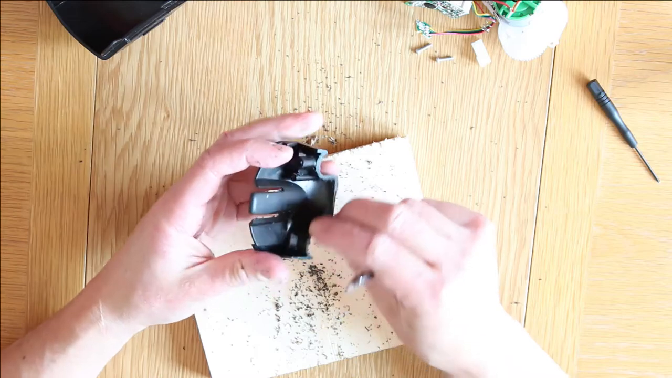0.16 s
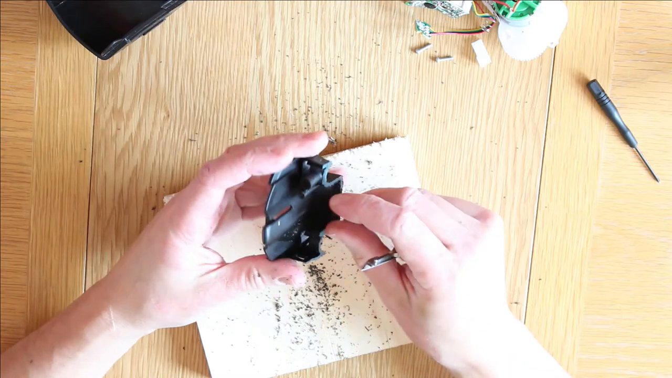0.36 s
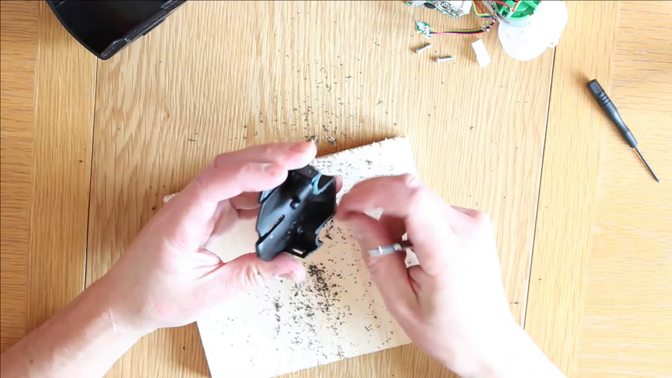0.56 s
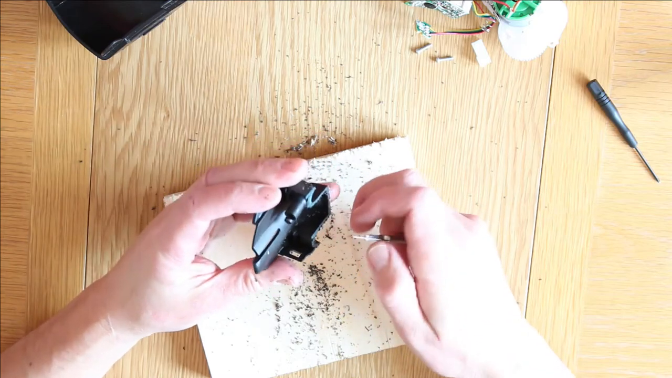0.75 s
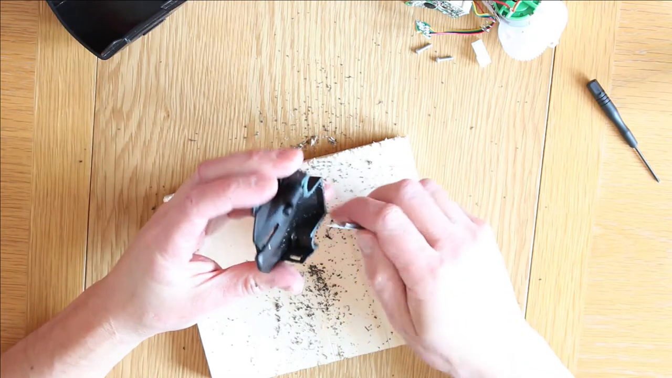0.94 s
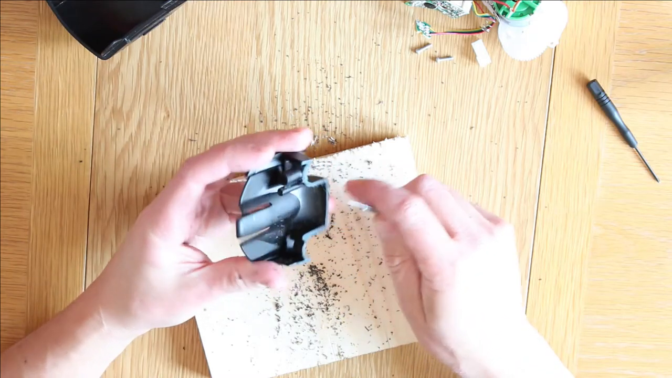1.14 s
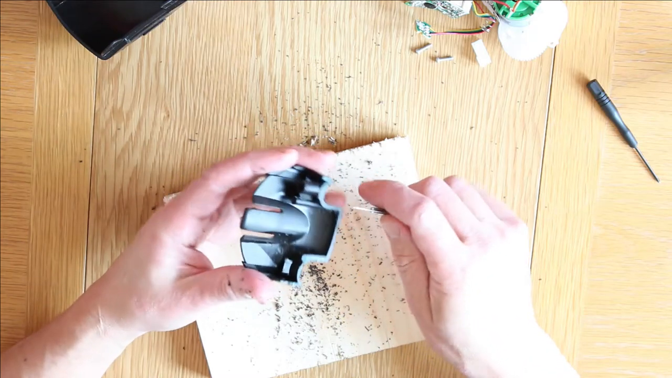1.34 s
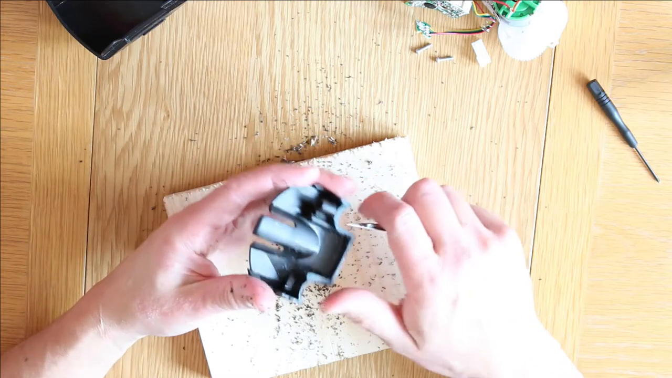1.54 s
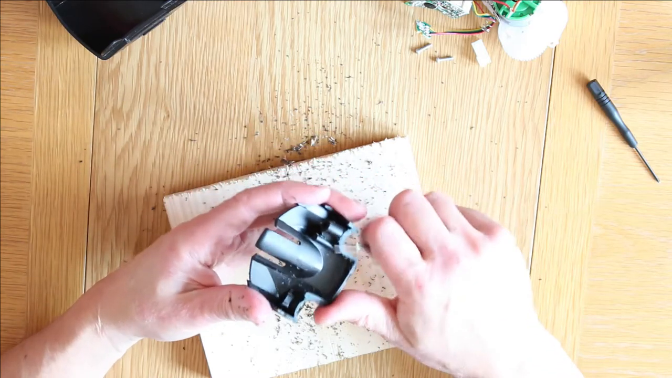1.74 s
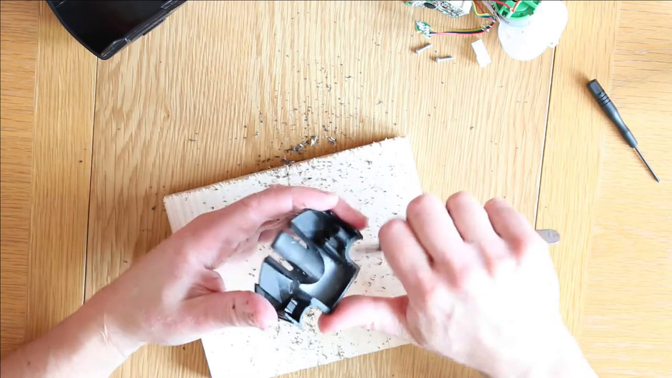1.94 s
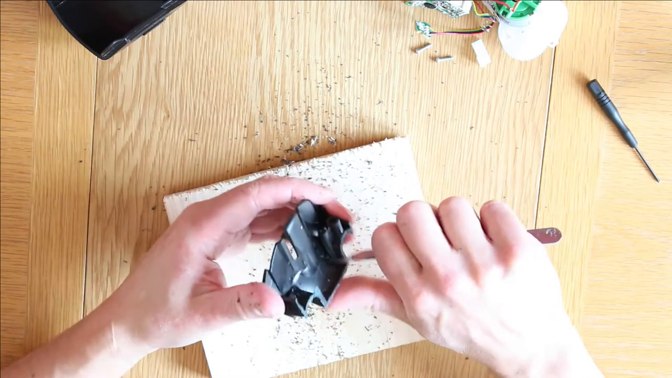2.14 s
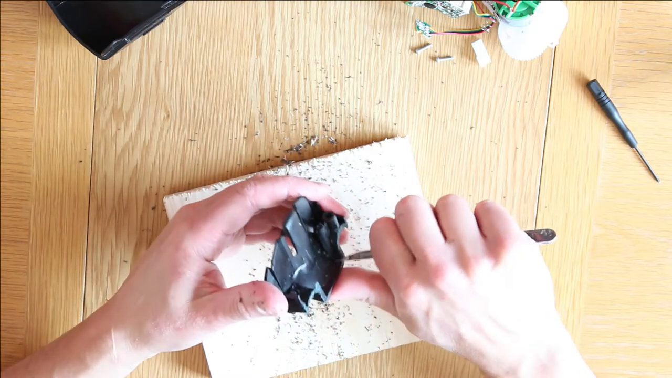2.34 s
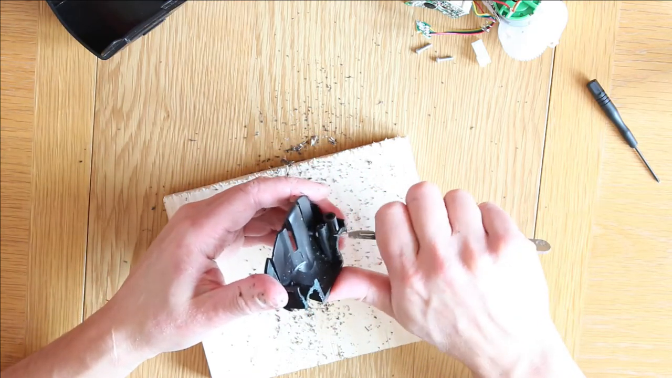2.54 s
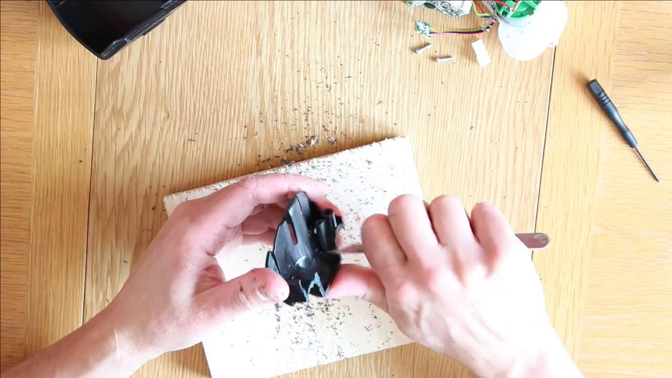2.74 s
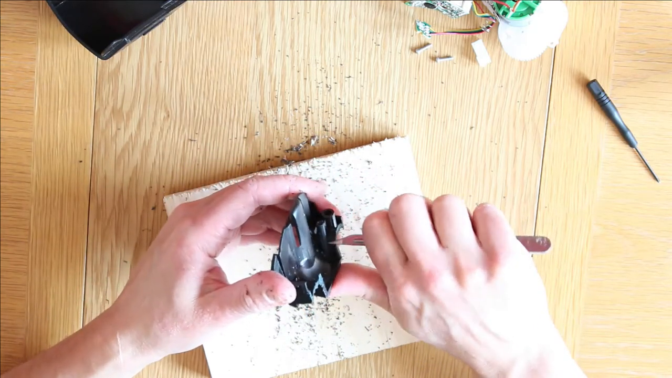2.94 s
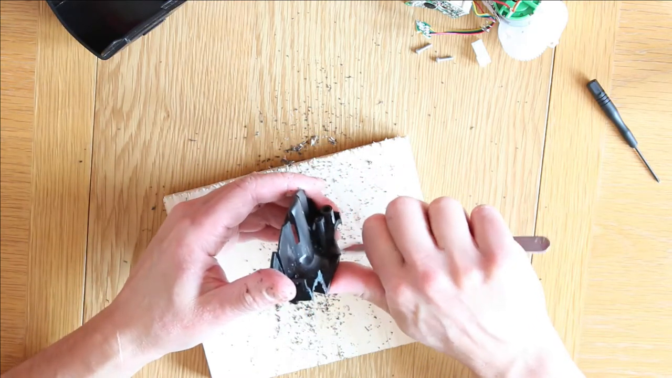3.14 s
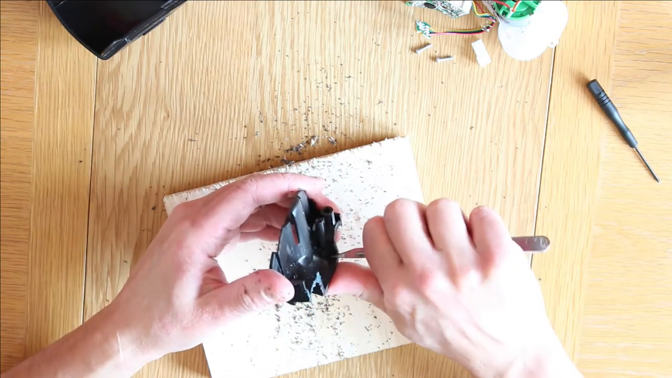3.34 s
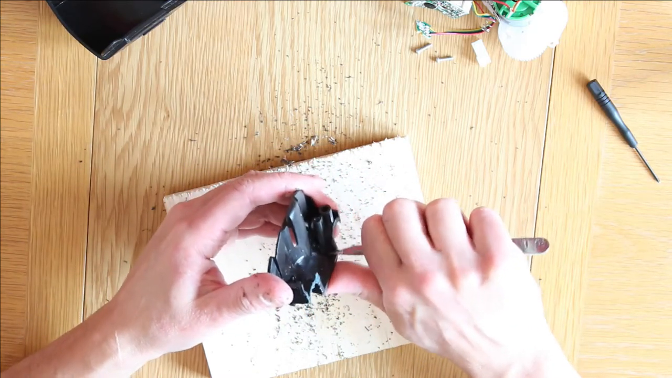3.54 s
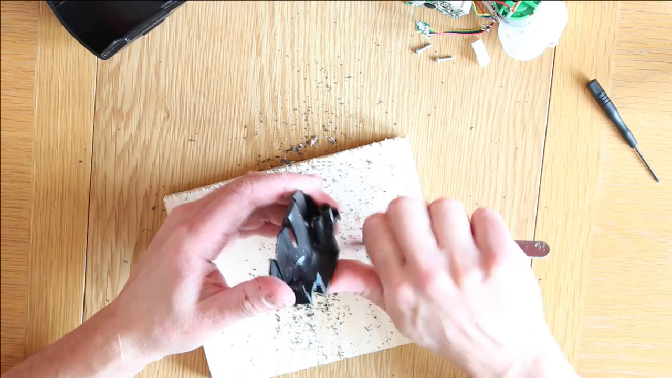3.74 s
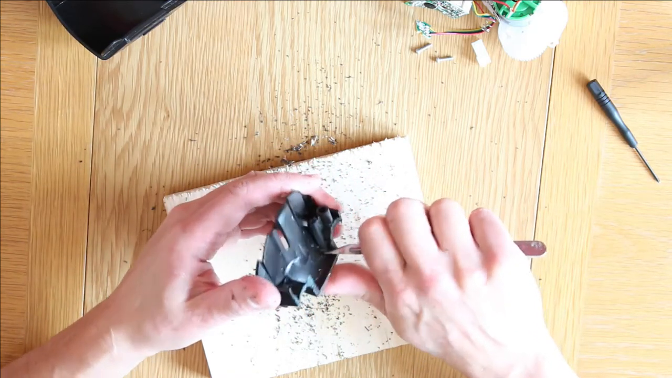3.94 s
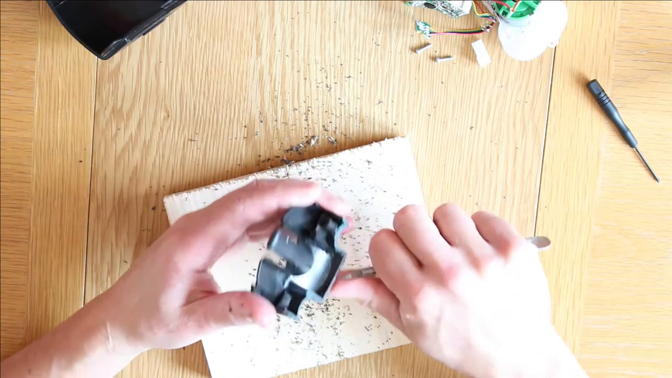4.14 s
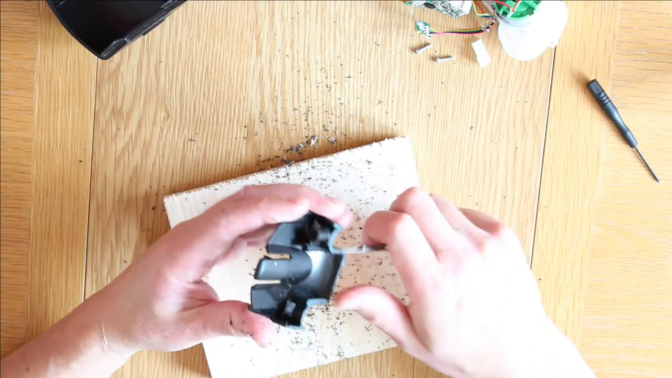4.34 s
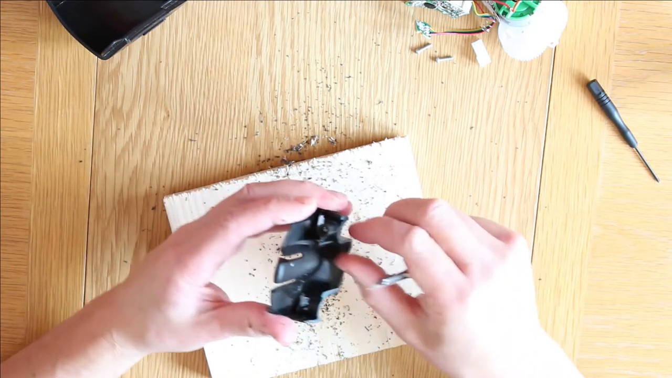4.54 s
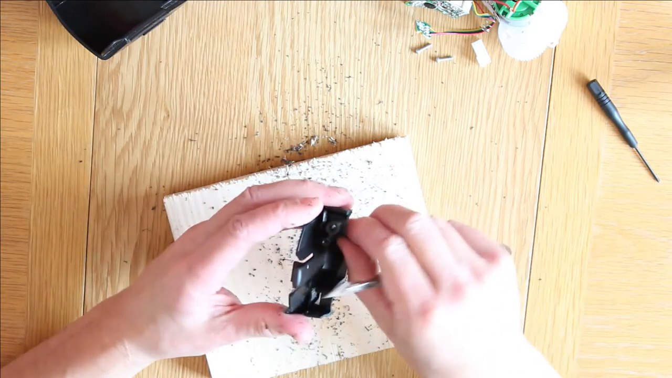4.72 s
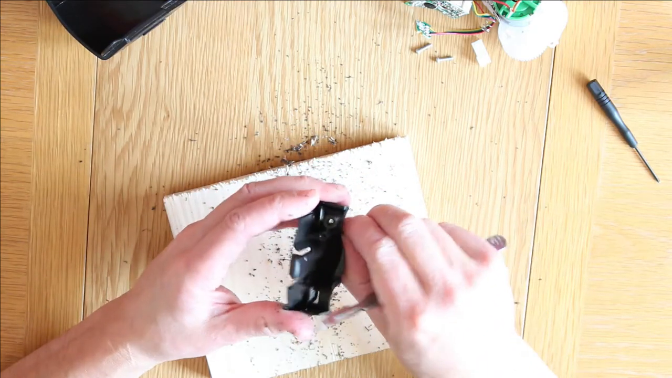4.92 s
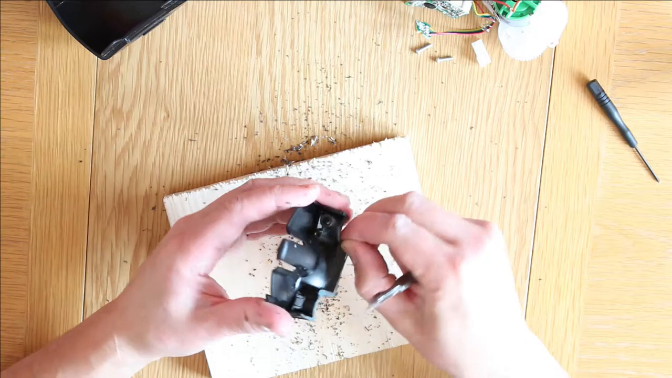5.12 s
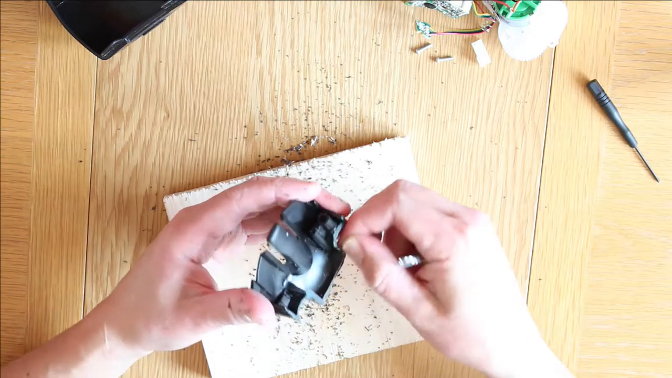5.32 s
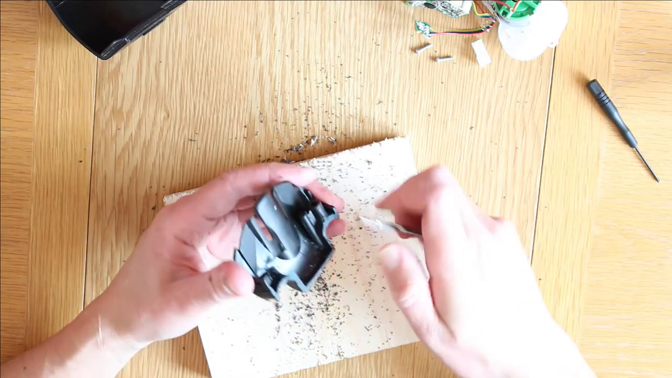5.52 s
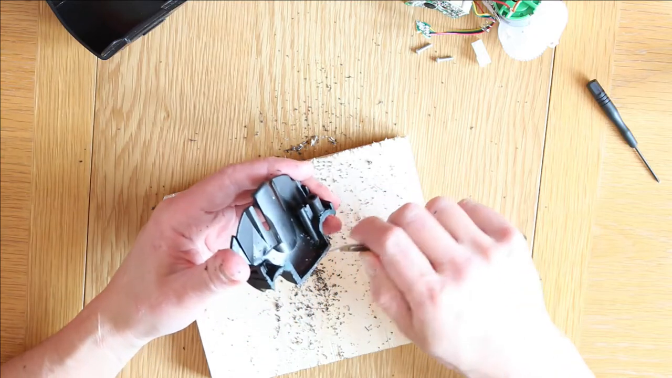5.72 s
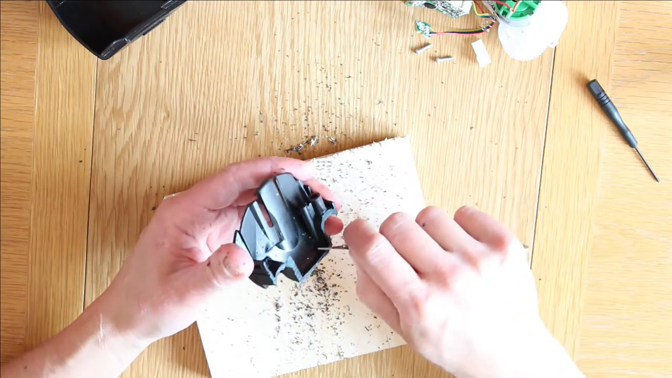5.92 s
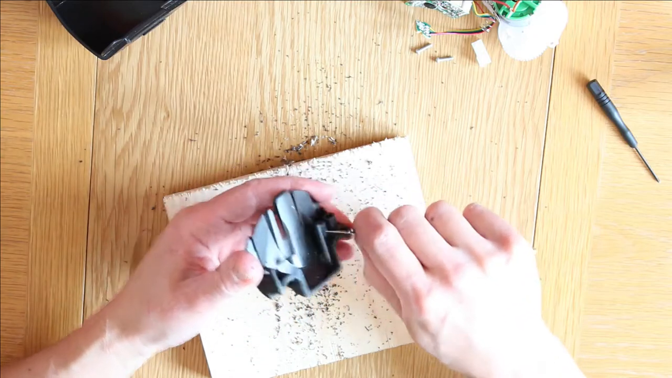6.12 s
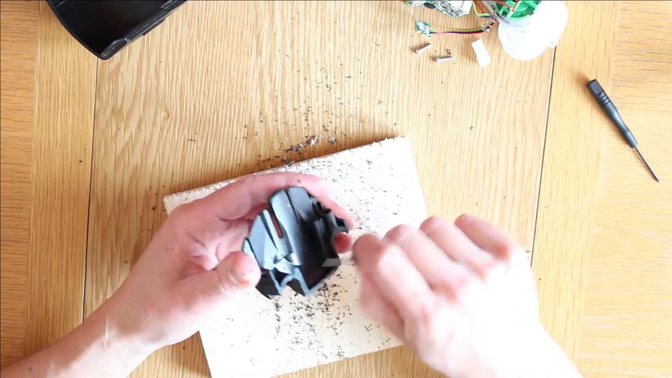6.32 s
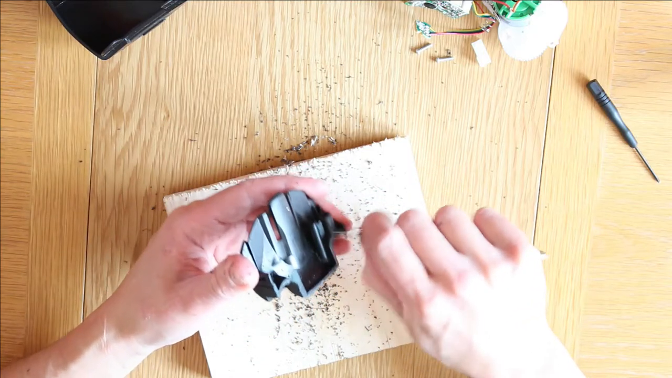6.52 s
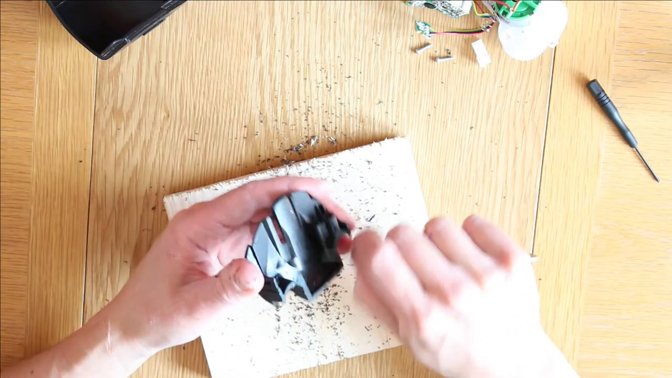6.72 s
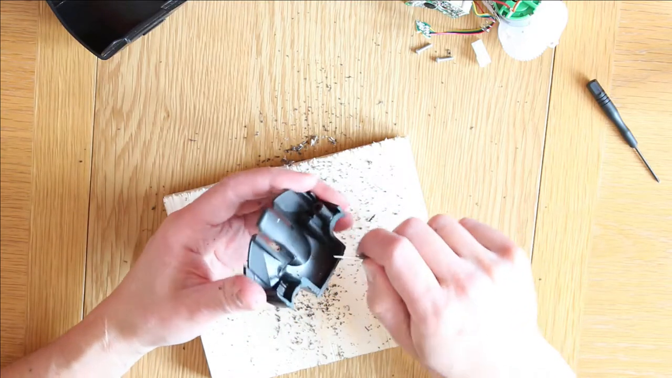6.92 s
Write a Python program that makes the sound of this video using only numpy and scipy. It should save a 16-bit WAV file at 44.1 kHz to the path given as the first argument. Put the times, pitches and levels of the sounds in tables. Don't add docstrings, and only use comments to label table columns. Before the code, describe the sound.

A small blade scrapes burrs from a thin plastic shell in short, dry, clicky stroke bursts with pauses, in a quiet bare room.

```python
import sys
import numpy as np
from scipy import signal
from scipy.fft import rfft, irfft
from scipy.io import wavfile

SR = 44100
rng = np.random.default_rng(int(sys.argv[2]) if len(sys.argv) > 2 else 0)


def dump(signal):
    limited = np.clip(np.atleast_2d(signal).T, -1, 1)
    pcm = np.round(limited * 32767).astype(np.int16)
    wavfile.write(sys.argv[1], SR, pcm)


def volts_from_db(level):
    exponent = np.asarray(level, float) / 20
    return 10 ** exponent


N = 311787

SPOT_CHANGES = [
    2.45,
    2.735,
    3.72,
    5.6,
]


def rms_one(x):
    return x / np.sqrt(np.mean(x ** 2) + 1e-20)


def in_time(rows):
    s, *columns = np.transpose(rows)
    return [np.interp(np.arange(N) / SR, s, column) for column in columns]


def at_hz(points, hz, axis=1):
    points = np.array(points)
    return np.interp(np.log(hz + 1), np.log(points[:, 0]), points[:, axis])


def coloured(spectrum):
    hz = np.fft.rfftfreq(N + 1, 1 / SR)
    white = rfft(rng.standard_normal(N + 1))
    return rms_one(irfft(white * volts_from_db(at_hz(spectrum, hz)), N + 1)[:N])


def room_tone():
    # f/Hz, density/dB per Hz
    mid_spectrum = [(24, -40), (40, -15), (109, -8), (147, -3.5), (529, -8.5), (646, -10.5), (990, -11),
                    (1440, -13.5), (4030, -15.5), (16000, -26.5)]
    # f/Hz, density/dB per Hz
    side_spectrum = [(24, -31), (40, -7), (49, -23), (112, -3), (412, -5), (1720, -11.5), (3470, -14.5),
                     (12500, -27.5), (14500, -40), (16000, -58)]
    mid = volts_from_db(-60.5) * coloured(mid_spectrum)
    side = volts_from_db(-56.5) * coloured(side_spectrum) + 0.22 * mid
    return np.stack([mid + side, mid - side])


def rumble():
    # t/s, f/Hz, level/dB
    run_down = [
        (0.0, 23.9, -63),
        (0.9, 23.5, -69),
        (1.9, 23.56, -70.5),
        (3.9, 21.8, -74),
        (7.07, 21, -88),
    ]
    hz, level_db = in_time(run_down)
    sine = volts_from_db(level_db + 13.0) * np.sin(2 * np.pi * np.cumsum(hz) / SR)
    drone = volts_from_db(0.67 * level_db - 21) * coloured([(45, -36), (68, 16), (100, -5), (150, -12), (220, -31)])
    right_under_left_db = 12.5
    return np.stack([sine + drone, -sine * volts_from_db(-right_under_left_db) - 0.29 * drone])


def room_tail():
    # f/Hz, t60/s, left-right correlation/1
    reverberation = [(299.4, 0.56, 0.97), (720, 0.34, 0.69), (2000, 0.41, 0.59), (5500, 0.43, 0.42),
                     (8850, 0.36, -0.13), (13800, 0.25, 1)]
    t = np.arange(SR // 2) / SR
    edges = 200 * 2 ** np.arange(0, 6.6, .5)
    tail = 0
    for low, high in zip(edges, edges[1:]):
        centre = np.sqrt(low * high)
        band = signal.butter(2, [low, high], "band", fs=SR, output="sos")
        mid, side = signal.sosfilt(band, rng.standard_normal((2, len(t))))
        alike = np.clip(at_hz(reverberation, centre, axis=2), -1, 1)
        dying = volts_from_db(-60 * t / at_hz(reverberation, centre))
        tail = tail + dying * (np.sqrt(1 + alike) * mid + np.sqrt(1 - alike) * side * [[1], [-1]])
    tail = tail * np.clip((t - .002) / 0.0037, 0, 1)
    return tail / np.sqrt(np.sum(tail ** 2) / 2)


def room(x):
    turn = 2 * np.pi * 3 * np.arange(N) / SR
    tails = 0
    for share in (np.cos(turn), np.sin(turn)):
        tails = tails + signal.fftconvolve((x * share)[None], room_tail(), axes=1)[:, :N]
    lag = round(.0075 * SR)
    echo = np.stack([np.roll(x, lag), -.5 * np.roll(x, lag + 5)])
    balance_db = np.array([[1.9], [-1.9]])
    return (volts_from_db(-0.5) * tails + volts_from_db(-3.5) * echo) * volts_from_db(balance_db)


def microphones(x):
    high_pass = signal.butter(2, 4000, "high", fs=SR, output="sos")
    treble = signal.sosfilt(high_pass, np.roll(x, round(.0006 * SR)))
    balance_db = np.array([[2.7], [-3.2]])
    return (x + 0.58 * treble * [[1], [-1]]) * volts_from_db(balance_db)


def squeak():
    # t/s, length/s, start f/Hz, end f/Hz, flutter width/Hz, level/dB
    songs = [
        (0.676, 0.053, 5650, 5600, 25, -67.5),
        (3.193, 0.038, 1173, 1326, 150, -56.5),
        (3.23, 0.0502, 1391, 1717, 198, -49.5),
    ]
    out = np.zeros(N)
    for s, length, start_hz, end_hz, width, level_db in songs:
        u = np.linspace(0, 1, round(length * SR))
        jitter = rng.standard_normal((2, SR // 5))[:, :len(u)]
        flutter = rms_one(signal.lfilter(*signal.butter(1, width, fs=SR), jitter))
        phase = 2 * np.pi * np.cumsum(start_hz + (end_hz - start_hz) * u) / SR
        tone = (1 + flutter[0]) * np.sin(phase) + flutter[1] * np.cos(phase)
        start = round(s * SR)
        out[start:start + len(u)] += volts_from_db(level_db) * np.sin(np.pi * u) * tone
    return out


def slips(per_s, spread_db, rub):
    sizes = volts_from_db(spread_db * np.minimum(rng.exponential(1, N), 4)) * rng.choice([-1, 1], N)
    clicks = rms_one(sizes * (rng.random(N) < per_s / SR))
    return rms_one(clicks + rub * rng.standard_normal(N))


def on_parts(s, cavity_db, wall_db, rim_db):
    blade_above_rim = [-1.5, -1.5, -2, -4.5, -1.5]
    blade_db = rim_db + blade_above_rim[np.searchsorted(SPOT_CHANGES, s)]
    return volts_from_db(cavity_db + np.array([wall_db, 0, rim_db, blade_db]))[:, None]


def blade_force():
    # t/s, length/s, cavity level/dB, wall above cavity/dB, rim above cavity/dB
    cuts = [(1.804, 0.0143, -48.5, 10, -4.5), (1.842, 0.038, -56, 5, -1), (1.875, 0.025, -46, -2, -1),
            (2.484, .029, -47, 1.5, 7), (2.541, 0.017, -39.5, -2.5, 7.5), (2.776, 0.043, -48, -1.5, -6),
            (2.81, 0.04, -51, -0.5, 0.5), (3.043, 0.078, -46, -5.5, 0), (3.232, 0.04, -52.5, -1, 3),
            (3.322, 0.033, -42.5, -4.5, 5), (3.55, 0.066, -39, -7, -1), (3.803, 0.023, -31, -12, 0),
            (4.05, 0.038, -45.5, -9, -8.5), (4.136, 0.032, -47.5, -1.5, 3), (4.161, 0.027, -54.5, -10, 9),
            (5.986, .014, -59.5, 4.5, -8), (6.091, 0.057, -34.5, -0.5, 2.5), (6.126, 0.059, -36.5, 0, 9),
            (6.411, 0.0089, -54, 7, -18), (6.469, 0.026, -42.5, 2, -4.5), (6.501, 0.037, -35, -4, -0.5),
            (6.539, .058, -36.5, -5, 9.5), (6.736, 0.021, -46.5, 2.5, -8), (6.752, 0.069, -41, -0.5, 4.5)]
    # t/s, length/s, cavity level/dB
    brushes = [(0.068, 0.026, -62.5), (0.137, 0.16, -70), (.296, 0.08, -66), (.682, .035, -77),
               (.725, 0.031, -69), (2.008, 0.026, -56), (2.092, 0.012, -56), (2.38, 0.042, -63),
               (2.739, 0.021, -56.5), (3.764, 0.027, -53), (4.751, 0.17, -70.5), (5.338, 0.067, -68.5)]
    # t/s, cavity level/dB, wall above/dB, rim above/dB
    catches = [(1.809, -37.5, -10, -11), (1.861, -43, -19, -13), (2.493, -39, -4, -7),
               (2.823, -37, -16, -9.5), (3.016, -59, -10, 6), (3.023, -51, -20, -1.5),
               (3.062, -53.5, 5, 14.5), (3.091, -48, -10, -2), (3.245, -51, -7, 5.5),
               (3.33, -36.5, -5.5, 0.5), (1.875, -42, 2.5, -10), (3.359, -40, -14, -2),
               (3.532, -55, -13, -3), (3.537, -51, -14, -4), (3.573, -56, 6, 15), (3.797, -47, -13, 11),
               (4.054, -37.5, -4.5, -3), (4.3, -67, -6, -6), (5.894, -81.5, 22, -2), (6.411, -47, 2, -18),
               (5.99, -58, -10, -16), (6.098, -56, 17, 4), (6.109, -43, -5, 11), (6.143, -37, 6, 15.5),
               (6.15, -53, 18, 9), (6.569, -54, 15, 3), (6.736, -40, 1.5, -14), (2.484, -51.5, 9, -4),
               (2.776, -50.5, -2.5, -12), (3.232, -53.5, 7, 6)]
    # t/s, blade level/dB
    springs = [
        (2.484, -43),
        (3.043, -45),
        (3.55, -45),
        (5.99, -52.5),
        (6.47, -55),
        (6.539, -23.5),
    ]
    pressure, catch = np.zeros((4, N)), np.zeros((4, N))
    brush_wall_db, brush_rim_db = -6, -4.5
    strokes = cuts + [(*row, brush_wall_db, brush_rim_db) for row in brushes]
    for s, length, *levels_db in strokes:
        u = np.linspace(0, 1, max(round(length * SR), 2))
        swell = np.clip(length / 0.062, 0, 1)
        lift_off = np.minimum(1, (1 - u) / 0.11)
        shape = (1.1 - 0.71 * swell + 0.51 * swell * np.sin(np.pi * u)) * lift_off
        start = round(s * SR)
        pressure[:, start:start + len(u)] += volts_from_db(-2.0) * on_parts(s, *levels_db) * shape

    bite_db, bite_loss_db_per_s, scatter_db = 5.5, 250, 3
    bites = [(s, db + bite_db - bite_loss_db_per_s * length, *colour) for s, length, db, *colour in strokes]
    crumbs = rng.standard_normal((80, 400)) * 0.2 * np.exp(-np.arange(400) / SR / 0.003)
    crumbs[:, 0] = 1
    scatter = volts_from_db(scatter_db * rng.standard_normal((80, 4, 1)))
    for (s, *levels_db), crumb, chance in zip(bites + catches, crumbs, scatter):
        start = round(s * SR)
        catch[:, start:start + len(crumb)] += volts_from_db(14.0) * on_parts(s, *levels_db) * chance * crumb
    shell_under_blade_db = -11.5 * np.array([[1], [1], [1], [0]])
    for (s, blade_db), crumb in zip(springs, crumbs[::-1]):
        start = round(s * SR)
        catch[:, start:start + len(crumb)] += volts_from_db(blade_db + 15.5 + shell_under_blade_db) * crumb

    shared = slips(per_s=900, spread_db=4.5, rub=0.7)
    own = [slips(per_s=1500, spread_db=6.5, rub=0.47) for part in pressure]
    return pressure * (0.63 * shared + 0.74 * np.array(own)) + catch


def resonate(force, modes):
    spot = np.searchsorted(SPOT_CHANGES, np.arange(N) / SR)
    total = np.sqrt(np.sum(volts_from_db(np.array(modes)[:, 2:]) ** 2, axis=0))
    out = 0
    for k, (hz, width, *levels_db) in enumerate(modes):
        r = np.exp(-np.pi * width / SR)
        sos = 2 * [[0.93, 0.0078, -1.008, 1, -2 * r * np.cos(2 * np.pi * hz / SR), r * r]]
        unit = np.linalg.norm(signal.sosfilt(sos, signal.unit_impulse(SR // 10)))
        struck = force * (volts_from_db(np.array(levels_db)) / total / unit)[spot]
        ringing = signal.sosfilt(sos, struck + 1e-18)
        out = out + (-1) ** k * ringing
    return out


def shell():
    # f/Hz, width/Hz, level/dB at spots 1 to 5
    wall = [(347, 280, -9.5, -12.5, -12.5, -14, -4), (438, 168, -7, -23, -10.5, -10, -5.5),
            (630, 183, 1, -10.5, -8, -10.5, 3), (880, 240, -3, -13, -21, -8.5, 3.5),
            (1131, 216, -11, 1.5, -3.5, -7, -1), (1294, 120, -4.5, -7, -4, 1.5, 3),
            (1450, 203, -3.5, -1.5, -3, -9, 3), (1756, 480, -19, -8, -11.5, -9, 1.5)]
    # f/Hz, width/Hz, level/dB at spots 1 to 5
    cavity = [(2067, 420, -7.5, -3.5, -6, -6, 2.5), (2540, 380, -1, -6, -3.5, 0, 5),
              (2895, 320, 0.5, -0.5, 1, 0, 3), (3210, 420, -6.5, -10, -2.5, -5, -1)]
    # f/Hz, width/Hz, level/dB at spots 1 to 5
    rim = [(3800, 1160, -4.5, -5.5, -5, -2, -4.5), (4390, 680, -5, -7, -4, -5, -10.5),
           (4840, 570, -3, -4.5, -2, 0, -4), (5350, 350, -3, -7, -5, -5, -4.5),
           (5650, 510, -1.5, -3, -4.5, -5, 2), (6090, 490, -12, -8.5, -9, -6.5, -8.5)]
    # f/Hz, width/Hz, level/dB at spots 1 to 5
    blade = [(6410, 680, -2, -3.5, -1, 0, -4), (7310, 970, -3, -4.5, -2.5, -0.5, -2),
             (8010, 730, -3, -14, -1.5, 0, 0), (8850, 1150, -5, -1, -8, -5, 0),
             (10300, 3140, -6, -12, -4, -5, -10.5), (11200, 2600, -5, -4.5, -7, -9, -6.5),
             (13040, 850, -14, -13, -11, -12, -9.5), (15000, 2700, -16, -13, -16, -18, -22)]
    parts = [wall, cavity, rim, blade]
    return sum(resonate(force, part) for force, part in zip(blade_force(), parts))


def scene():
    near = shell() + squeak()
    return microphones(near) + room(near) + rumble() + room_tone()


def band_limit(x):
    return signal.sosfilt(signal.butter(12, 16830, fs=SR, output="sos"), x)


def record(dry):
    top_cut = signal.cheby2(16, 70, 16200, fs=SR, output="sos")
    mix = signal.sosfilt(top_cut, dry)
    return band_limit(mix)


dry = scene()
out = record(dry)
dump(out)
```